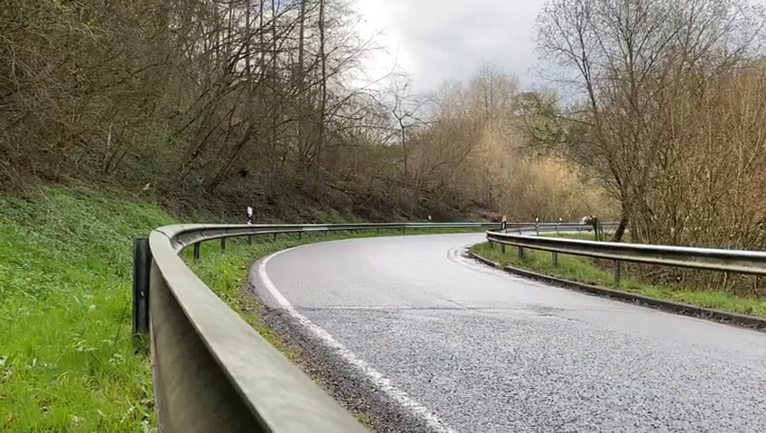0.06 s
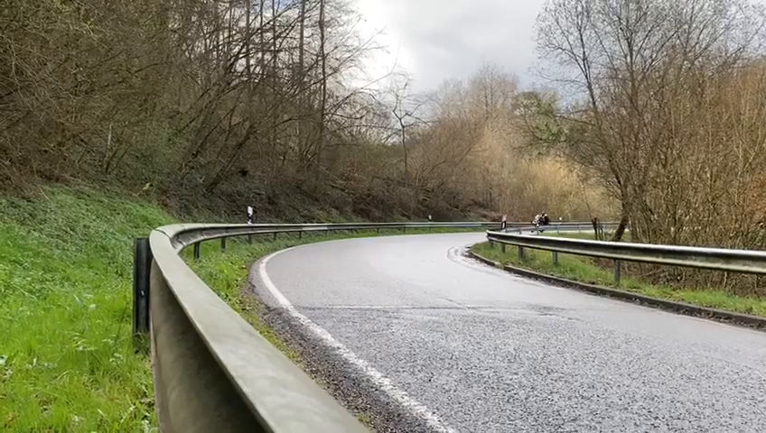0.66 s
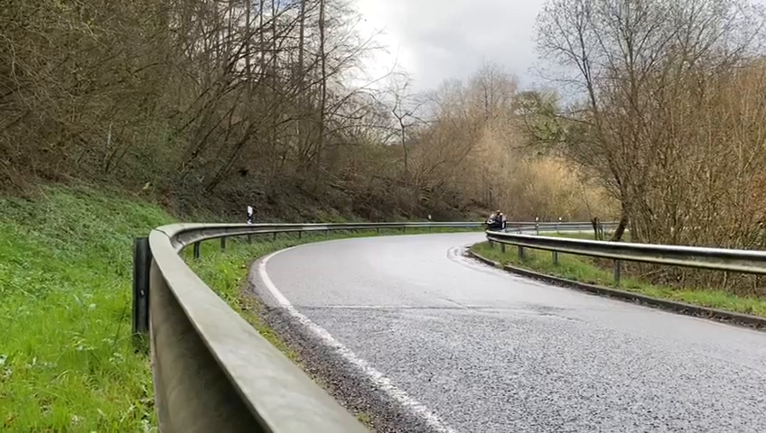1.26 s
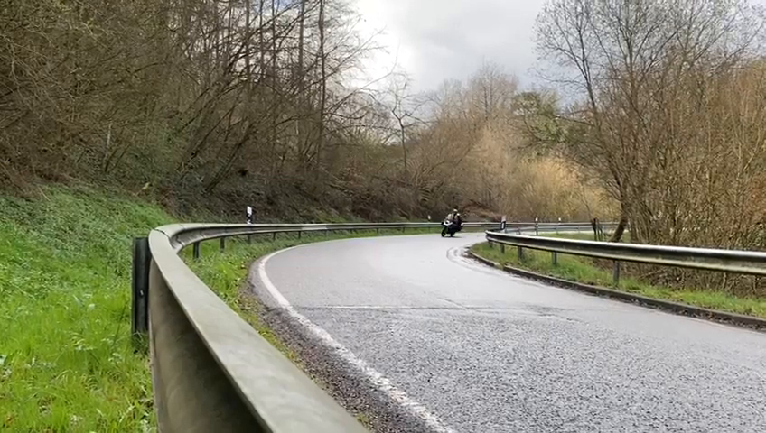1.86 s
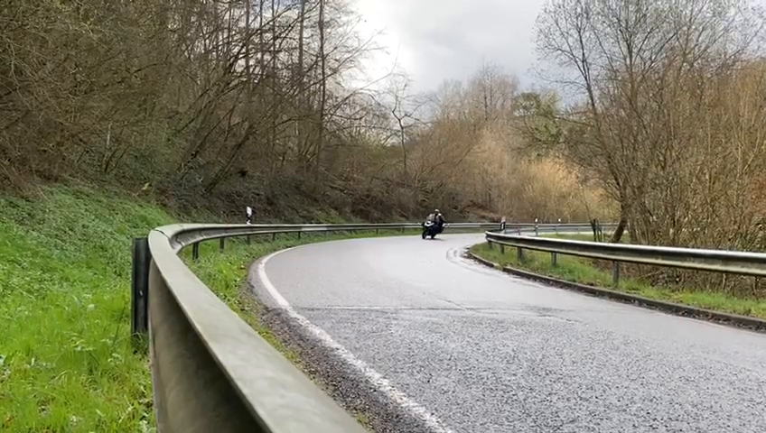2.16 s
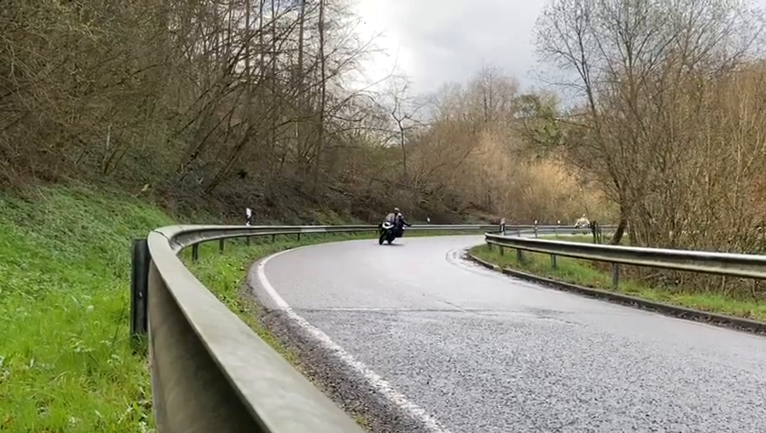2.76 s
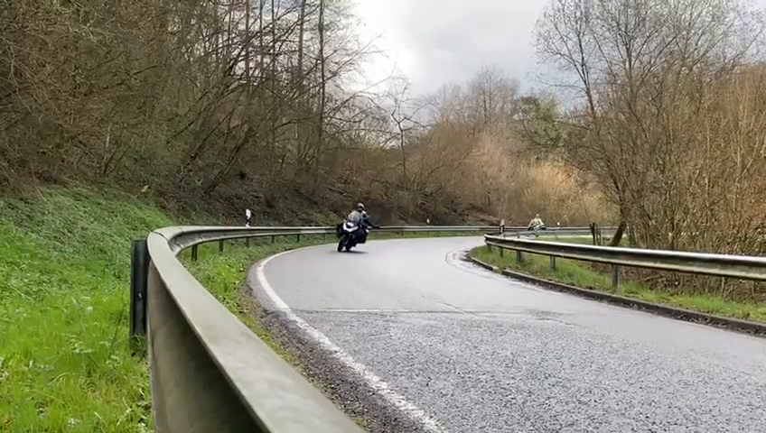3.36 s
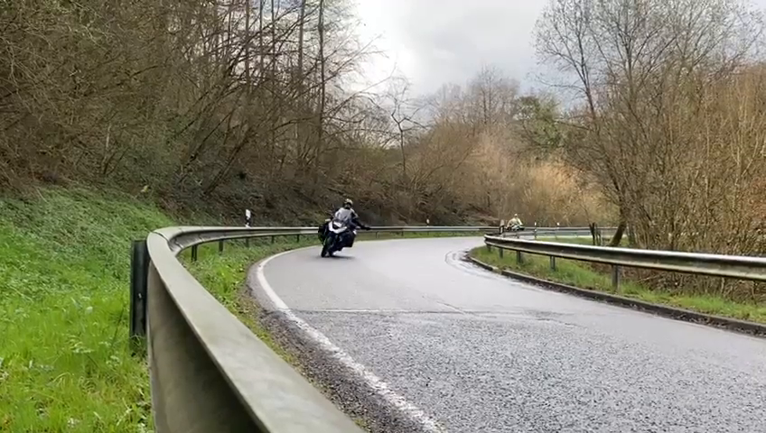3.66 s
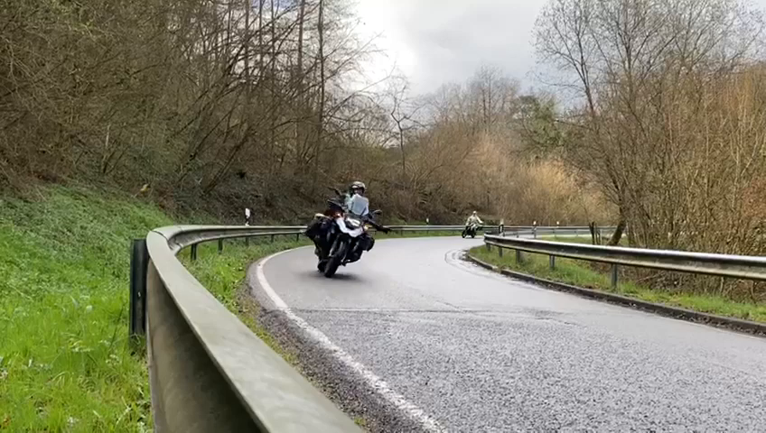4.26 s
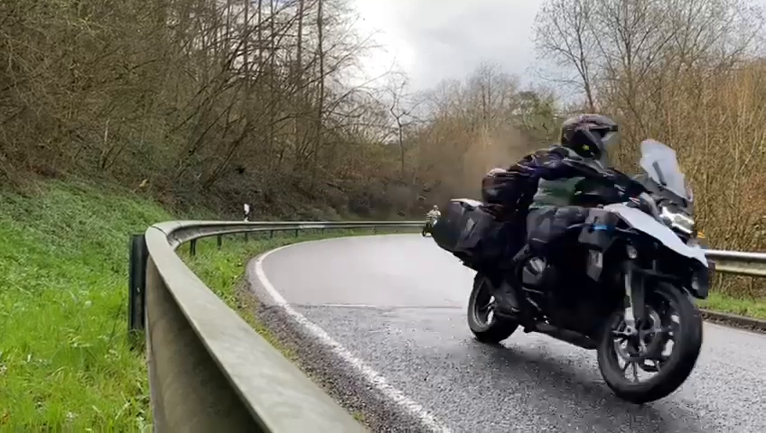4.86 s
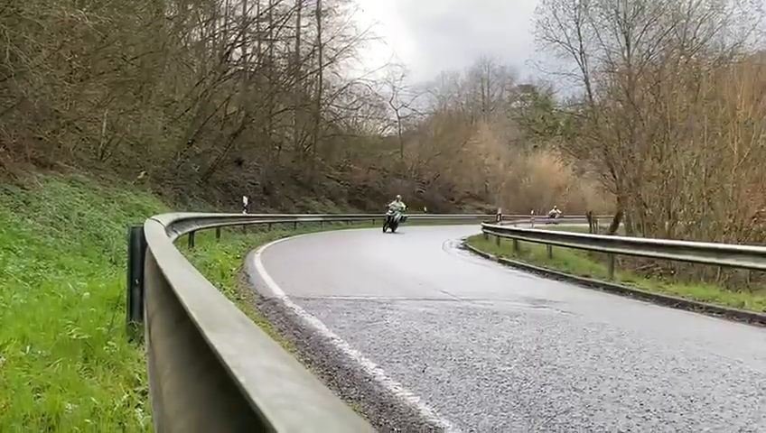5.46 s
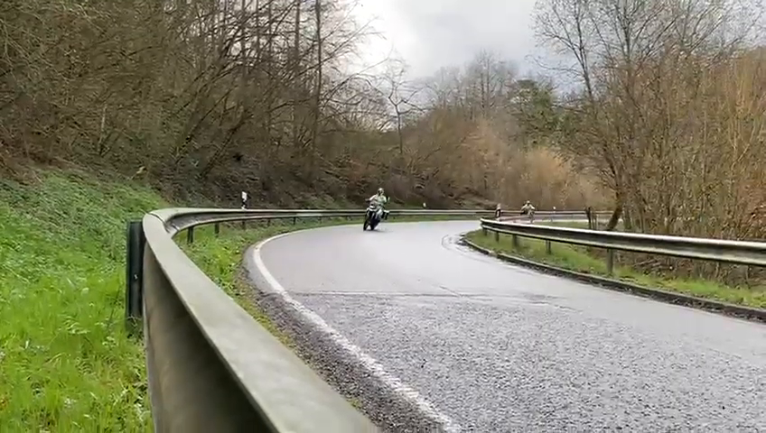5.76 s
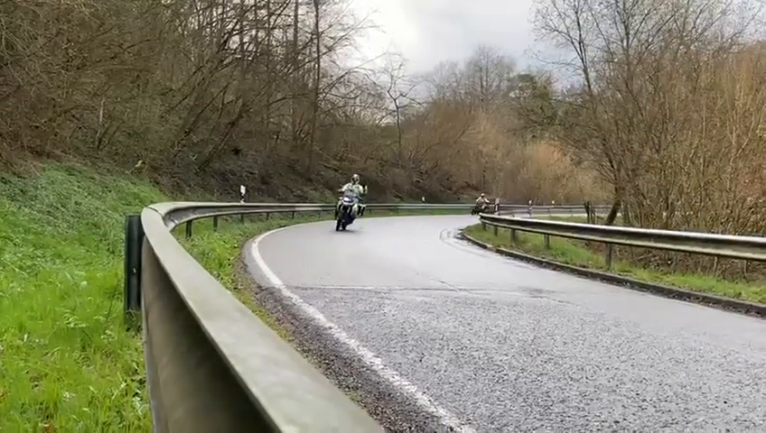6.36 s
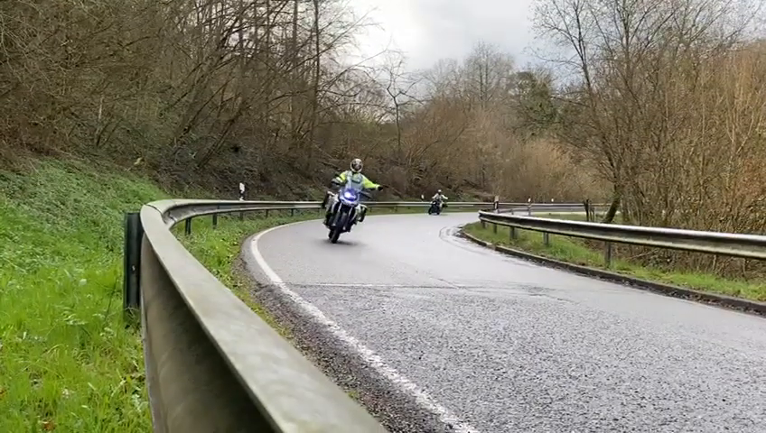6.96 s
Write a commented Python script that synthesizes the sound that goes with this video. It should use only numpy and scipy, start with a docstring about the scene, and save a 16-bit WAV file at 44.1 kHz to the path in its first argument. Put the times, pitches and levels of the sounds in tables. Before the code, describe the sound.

Heard from the edge of a wooded country road, several motorcycles hum in the distance under a few thin bird chirps. One approaches at low revs, its throbbing engine and hissing tyres building to a close pass from left to right. Its note drops slightly as it leaves. A soft knock and a tick follow as the engines behind it grow louder.

```python
"""First you hear motorcycles droning far off in a damp country bend, soon joined by faint birds.
The lead bike, a twin-cylinder at low revs, comes into the open and passes close by, left to right,
while two more follow at a distance. Each firing of its engine pushes out a puff of gas; the puffs
blend into a drone over a pulsing rasp. Tyre roar and spray swell as it goes by, bounce off the road
and make the steel guard rail ring faintly. A dull knock and a tick come near the end."""
import sys
import numpy as np
from scipy import signal
from scipy.fft import rfft, irfft, next_fast_len
from scipy.io import wavfile
from scipy.ndimage import uniform_filter1d, minimum_filter1d

SR = 44100
rng = np.random.default_rng(int(sys.argv[2]) if len(sys.argv) > 2 else 0)


def transcribe(u):
    """Save the signal u as a 16-bit wav file named by the first command-line argument.

    u: samples, shape (n,) or (channels, n), limited to [-1, 1]; the rate is SR.
    q: integer samples, one column per channel.
    """
    v = np.clip(np.atleast_2d(u).T, -1, 1)
    q = np.round(v * 32767).astype(np.int16)
    wavfile.write(sys.argv[1], SR, q)


N = 313110
TIME = np.arange(N) / SR


def from_db(db):
    """Turn decibels into a number to multiply by."""
    return 10 ** (np.asarray(db) / 20)


def rms_one(x):
    """Scale a signal so that its average power is 1."""
    return x / np.sqrt(np.mean(x ** 2) + 1e-20)


def in_time(rows, t=TIME):
    """Read a table's columns at times t, gliding between rows."""
    times, *columns = np.transpose(rows)
    return [np.interp(t, times, c) for c in columns]


def at_hz(rows, hz):
    """Read a table's columns at frequencies hz, gliding between rows."""
    freqs, *columns = np.transpose(rows)
    return np.array([np.interp(np.log(hz + 1), np.log(freqs), c) for c in columns])


def drift(rate_hz):
    """A smooth random wander, typically about 1 away from zero."""
    pole = np.exp(-200 * np.pi * rate_hz / SR)
    steps = rng.standard_normal(N // 100 + 1002)   # one for every 100 samples
    slow = signal.lfilter([1], [1, -2 * pole, pole * pole], steps)[1000:]
    return np.interp(np.arange(N) / 100, np.arange(len(slow)), rms_one(slow))


def blend(shapes, points, x):
    """Fade from shape to shape along x; each is heard alone at its own point."""
    weights = [np.interp(x, points, row) for row in np.eye(len(points))]
    return sum(shape.reshape(len(shape), -1) * weight for shape, weight in zip(shapes, weights))


def bump(x, centre, half_width):
    """A bell curve of height 1."""
    return np.exp(-((x - centre) / half_width) ** 2)


def until(time_s, takes_s):
    """Fall smoothly from 1 to 0 around time_s."""
    return (1 - np.tanh((TIME - time_s) / takes_s)) / 2


def die_away(n):
    """Fade by 60 dB over n samples."""
    return np.exp(-np.log(1000) * np.arange(n) / n)


# bird calls: (time [s], length [s], start pitch [Hz], end pitch [Hz], relative level [dB])
CHIRPS = [(1.519, .07, 5680, 5400, -60.5), (1.66, 0.025, 5600, 5250, -61.5), (1.705, .06, 4350, 4350, -63),
          (2.198, .055, 4300, 4420, -54), (2.676, .025, 5680, 5290, -57), (2.712, 0.075, 4420, 4370, -53.5),
          (3.181, .025, 5540, 5155, -56.5), (3.226, 0.08, 4370, 4400, -54)]


def birds(level_db, waver):
    """Small birds whistle short, gliding notes with a wavering pitch."""
    out, wobble = np.zeros(N), 1 + waver * drift(60)
    for time_s, length_s, start_hz, end_hz, db in CHIRPS:
        n, at = int(length_s * SR), int(time_s * SR)
        hz = np.linspace(start_hz, end_hz, n) * wobble[at:at + n]
        whistle = np.sin(2 * np.pi * np.cumsum(hz) / SR)
        out[at:at + n] += from_db(db + level_db) * np.sqrt(2 * np.hanning(n)) * whistle
    return out


def tree_echo(x, ring_s, level_db):
    """The trees add a soft tail of echoes, a different one for each ear."""
    n = int(ring_s * SR)
    tail = rms_one(rng.standard_normal((2, n)) * die_away(n)) / np.sqrt(n)
    return x + from_db(level_db) * signal.fftconvolve(x[None], tail, axes=1)[:, :N]


# a dull knock and a tick: (time [s], centre [Hz], length [s], level [dB], left over right [dB])
KNOCKS = [(6.046, 580, .045, -26, -5), (6.701, 5000, .025, -39, 0)]


def knocks():
    """Short bursts of noise, an octave wide, that die quickly."""
    out = np.zeros((2, N))
    for time_s, hz, length_s, db, pan_db in KNOCKS:
        n, at = int(length_s * SR), int(time_s * SR)
        band = signal.butter(2, [hz / np.sqrt(2), hz * np.sqrt(2)], "band", fs=SR, output="sos")
        burst = rms_one(signal.sosfilt(band, rng.standard_normal(n))) * die_away(n)
        out[:, at:at + n] += from_db([[db + pan_db / 2], [db - pan_db / 2]]) * burst
    return out


def firing_phase(firing_hz, wobble):
    """An angle that goes round once per firing of a slightly uneven engine."""
    return 2 * np.pi * np.cumsum(firing_hz * (1 + wobble * drift(16))) / SR


def drone(phase, tones, flutter_db):
    """Tones at multiples of the firing rate, each fluttering as echoes from the roadside bank shift."""
    out = 0
    for multiple, db in tones:
        gain = from_db(db + flutter_db * drift(4.7))
        out += gain * np.cos(multiple * phase + rng.uniform(0, 2 * np.pi))
    return np.sqrt(2) * out


def distant_bike(ride, tones, dulling, spread):
    """Only the drone carries this far, duller when it is fainter; the trees scatter some of it."""
    firing_hz, level_db = in_time(ride)
    phase = firing_phase(firing_hz, wobble=0.01287)
    dull_db = dulling * (level_db - level_db.max())
    heard = [(multiple, db + level_db + multiple * dull_db) for multiple, db in tones]
    direct = drone(phase, heard, flutter_db=2.6)
    scattered = drone(phase, heard, flutter_db=7)
    return direct + spread * scattered * [[1], [-1]]


# how each following bike runs: (time [s], firing rate [Hz], level [dB])
SECOND_RIDE = [(0, 44.33, -44), (.8, 44.9, -43), (1.3, 47.52, -39.5), (3, 44.15, -43.5), (5, 44.1, -58),
               (6.1, 44.2, -39), (6.7, 44.48, -33), (7.1, 44.8, -31)]
THIRD_RIDE = [(0, 77.44, -30.5), (1.2, 76.94, -34.5), (2.5, 74.68, -40), (4, 81, -42), (6, 76.8, -45.5),
              (7.1, 79.5, -41)]
# the tones of their drones: (pitch [times the firing rate], relative level [dB])
SECOND_TONES = [(1, -5.5), (2, 1), (3, -1.5), (3.5, -12.5), (10, -10.5), (11.5, -14)]
THIRD_TONES = [(1, -4.5), (2, -22.5), (3, -19)]


def following_bikes():
    """Two more engines drone in the distance, one low and one higher."""
    second = distant_bike(SECOND_RIDE, SECOND_TONES, dulling=0.11, spread=0.28)
    return second + distant_bike(THIRD_RIDE, THIRD_TONES, dulling=0.08, spread=0.13)


# the notes of the guard rail: (pitch [Hz], level against the noise that shakes it [dB])
RAIL_NOTES = [(1088, -13.5), (1179, -5), (1527, -4.5), (1687, -1), (2194, -3.5), (2463, -4.5), (2678, -8.5),
              (3112, -10.5)]


def guard_rail(noise, width_hz):
    """The steel rail beside the microphone rings along with the noise of the ride."""
    return noise + sum(from_db(db) * signal.lfilter(*signal.iirpeak(hz, hz / width_hz, fs=SR), noise)
                       for hz, db in RAIL_NOTES)


PASS_S, SPEED_M_PER_S = 4.991, 12.3   # when and how fast the lead bike's front wheel goes by


def pass_by(closest_m, behind_m):
    """For a spot behind the front wheel: dB lost to distance, and how much we hear its rear (0-1)."""
    along_m = SPEED_M_PER_S * (TIME - PASS_S) - behind_m
    distance_m = np.hypot(along_m, closest_m)
    return 20 * np.log10(closest_m / distance_m), np.maximum(along_m / distance_m, 0) ** 2


def hidden():
    """The inside of the bend hides the lead bike (1) until it comes into the open (0)."""
    return until(1.86, takes_s=0.23)


# noise from the bikes still in the bend: (time [s], relative level [dB])
BEND_NOISE = [(0, -8.7), (.7, -8.5), (1.2, -5), (1.6, -2.5), (2, -2), (2.6, -0.1), (3.5, 0.7), (4.3, 0),
              (5.8, 0.5), (6.2, 0.9), (6.55, 2.5), (7.1, 5)]
# rumble, rasp, tyre roar and spray, a row each: (behind the front wheel [m], level alongside [dB],
# distance effect [factor], change from behind [dB], change while hidden [dB], level from the bend [dB],
# effect of BEND_NOISE [factor])
RIDE_NOISES = [(2.4, -21.5, 0.94, -9.5, -8.5, -39.5, 0.99), (0, -24, 1.08, 3.5, -1.5, -39.5, 1.34),
               (1.45, -22.5, 1.225, -9, -2.5, -40.5, 0.8), (1.445, -28, 1.063, -12, -5, -55, 1.47)]


def noise_levels():
    """Relative dB of the four noises: the lead bike's swell on top of the noise from the bend."""
    levels, bend_db = [], in_time(BEND_NOISE)[0]
    for behind_m, db, falloff, rear_db, hidden_db, far_db, swing in RIDE_NOISES:
        distance_db, rear = pass_by(closest_m=2.34, behind_m=behind_m)
        close = from_db(db + falloff * distance_db + rear_db * rear)
        far = from_db(far_db + swing * bend_db)
        levels.append(20 * np.log10(np.hypot(close, far)) + hidden_db * hidden())
    return levels


# the deep tone of the exhaust gas: (frequency [Hz], relative level [dB])
RUMBLE_TONE = [(18, -3), (30, -2.5), (45, 3.5), (80, 7.5), (140, 7), (200, 2.5), (280, -20), (420, -38)]


def gas_rumble(level_db, boost_db, width):
    """Swirling exhaust gas rumbles, and its echo from the wooded bank widens the sound."""
    size = next_fast_len(N)
    tone = from_db(at_hz(RUMBLE_TONE, np.fft.rfftfreq(size, 1 / SR)))
    noise = rng.standard_normal((2, size))
    direct, echo = rms_one(irfft(tone * rfft(noise))[:, :N])
    return from_db(level_db + boost_db) * (direct + width * echo * [[1], [-1]])


def road_echo(hz, t, lowest_dip_hz, strength, scatter_hz):
    """The bounce off the road cancels a band, lowest and deepest when the bike is close."""
    distance_db, _ = pass_by(closest_m=3.6, behind_m=2.94)
    nearness = from_db(np.interp(t, TIME, distance_db))
    dip_hz = lowest_dip_hz / nearness
    bounce = strength * nearness * bump(hz[:, None], 0, scatter_hz)   # rough asphalt scatters the treble
    return abs(1 + bounce * np.exp(1j * np.pi * hz[:, None] / dip_hz))


def echo_ripple(hz, t, depth_db, frames=18):
    """Weak echoes from trunks and rail shift, so narrow peaks and dips come and go in the noise."""
    chance = rng.standard_normal((len(hz), len(t)))
    smooth = uniform_filter1d(uniform_filter1d(chance, frames), frames)
    return from_db(depth_db * rms_one(smooth))


# brief changes in the roar: (time [s], half length [s], centre [Hz], half width [octaves], change [dB])
ROAR_SWELLS = [(1.58, 0.098, 1190, 0.5, 4.5), (3.4, 0.34, 2481, 0.13, 2.5), (4.803, 0.17, 3201, 0.36, 5.2),
               (4.985, 0.051, 1400, 0.4, 2.5), (5.095, 0.051, 2600, .25, 5), (5.235, .06, 1210, .4, 2.5),
               (5.34, 0.066, 2400, .4, 4.5), (5.48, .12, 2227, 0.24, 6), (5.72, .13, 6500, 0.17, 3.5),
               (5.98, 0.27, 2200, 1, -0.5), (6.55, .2, 1191, .5, 3), (6.902, .35, 2300, 0.34, 2)]


def roar_swells(hz, t):
    """The road roar swells or eases briefly in single bands as the bikes move."""
    change_db = 0
    for time_s, half_s, centre_hz, octaves, db in ROAR_SWELLS:
        band = bump(np.log2((hz + 1) / centre_hz), 0, octaves)
        change_db += db * np.outer(band, bump(t, time_s, half_s))
    return from_db(change_db)


# a narrow gap in the roar: (time [s], height above its lowest point [Hz], depth [dB])
HOLLOW = [(5.14, 700, 0), (5.2, 420, -5), (5.27, 30, -10), (5.38, 0, -13), (5.5, 200, -12), (5.62, 290, 0)]


def hollow(hz, t, lowest_hz, half_width_hz):
    """Once the bike is past, the two ears cancel in a narrow band that swoops down and climbs again."""
    above_hz, depth_db = in_time(HOLLOW, t)
    return from_db(depth_db * bump(hz[:, None], lowest_hz + above_hz, half_width_hz))


# how noise from each direction reaches the two ears:
# (frequency [Hz], likeness [0-1], left over right [dB], left lag [radians])
FROM_FAR = [(255, 1, -1.5, 1.5), (600, 0.4, -5, 0), (1400, 0.6, 0, 2), (2230, 0.06, 1.5, 1.5),
            (4230, 0.1, 3, -8.5), (5770, 0.95, 2.5, 25), (6540, 1, 0, -12.5)]
FROM_AHEAD = [(250, 0.97, -2.5, 0), (880, 1, -1, 0), (1360, 0.75, 0, -0.2), (2620, .8, 0, -0.2),
              (3950, 1, -1, -2.5), (4456, 0.33, 7, -2.7), (5200, 0.44, -1, 0.5), (6600, .99, 0.5, 0)]
FROM_BESIDE = [(250, 1, -1.5, .1), (900, 0.92, -5, -0.096), (1600, 0.99, -1.5, 0.84), (2503, .5, 4, -0.64),
               (4200, 0.92, 0, -0.25), (5530, 0.45, 2, 1.4), (7050, 1, -0.5, -0.28)]
FROM_BEHIND = [(250, 0.9, -2.5, 0.8), (600, 0.7, -3, 2.3), (1100, 0.76, -5, 2.35), (1480, 0.99, -0.8, 2.9),
               (1660, 0.99, -0.8, 3.35), (1880, 0.85, -2, 4.2), (2200, 0.8, -2.5, 4.9),
               (3000, 0.55, 1.2, 5.8), (4300, 0.43, -0.7, 5.7), (5500, 0.37, 0.5, 6.5),
               (7000, .97, 0, 6.28)]
FROM_LEAVING = [(260, 0.89, -10, 0.75), (600, 0.84, -14.5, 2.11), (1100, 0.45, -8.5, 2.4),
                (1800, 0.83, -6.5, 2.3), (2400, 0.56, -2, 4.9), (3300, 0.24, -0.5, 4.3),
                (4500, 0.09, 1, 5.3), (5800, 0.1, 3.5, 5.3), (7000, 1, 1.5, 7), (8300, 1, -1.5, 5.6)]
FROM_BOTH_WAYS = [(250, 0.49, -11, 2.2), (603.5, 0.26, -10.5, 1.2), (1300, 0.24, -4, 2.5),
                  (2210, 0.18, -0.5, 0.6), (3180, 0.61, 0, -1.5), (5670, 0.15, 1.5, 1.5), (7050, 1, 1, 0.5),
                  (8300, 1, -3, -1)]
# when each step of the route below is reached: (time [s])
DIRECTION_TIMES = [.8, 2.2, 4.55, 4.85, 5.02, 5.19, 5.48, 5.62, 5.78, 6.099]


def stereo_image(hz, t):
    """As the bike's direction turns: how alike the ears are (with their lag), and the lean to the left."""
    far, ahead, beside = (at_hz(rows, hz) for rows in (FROM_FAR, FROM_AHEAD, FROM_BESIDE))
    leaving, both = at_hz(FROM_LEAVING, hz), at_hz(FROM_BOTH_WAYS, hz)
    swoop_hz = np.outer(np.interp(hz, [0, 2000, 5000], [0, 1, 0]), in_time(HOLLOW, t)[0])
    behind = at_hz(FROM_BEHIND, hz[:, None] - swoop_hz)   # slides along with the hollow
    route = [far, ahead, ahead, beside, beside, behind, behind, leaving, leaving, both]
    likenesses, pan_dbs, lags = zip(*route)
    turn = np.angle(blend([np.exp(-1j * lag) for lag in lags], DIRECTION_TIMES, t))
    alike = np.clip(blend(likenesses, DIRECTION_TIMES, t), 0, 0.995) * np.exp(1j * turn)
    return alike, from_db(blend(pan_dbs, DIRECTION_TIMES, t) / 2)


# tone of rasp, tyres and spray for each view of the bike: (frequency [Hz], relative level [dB])
TONE_FAR = [(250, 1), (330, -9.5), (520, -11), (800, -14), (1050, -13.5), (1300, -11.5), (1700, -13.5),
            (2100, -16), (3100, -18), (4000, -25), (5500, -30), (7500, -34), (9000, -43), (11500, -61)]
TONE_LEANING = [(250, -12), (340, -9), (550, -8.5), (740, -14), (950, -10.5), (1420, -14.5), (1660, -10),
                (1850, -13.5), (2200, -13), (2900, -11.5), (4200, -12.5), (5500, -18), (7800, -18.5),
                (11500, -40.5)]
TONE_AHEAD = [(250, 2), (340, -2.5), (450, -5), (590, 0), (770, -5), (1230, -5), (1700, -9.5), (2150, -14),
              (3000, -10.5), (4100, -16.5), (5500, -29.5), (7500, -27.5), (9000, -35.5), (11500, -45.5)]
TONE_BESIDE = [(250, -5), (400, -4), (600, 1), (800, -4.5), (1000, -4.5), (1250, -0.5), (1550, 0.5),
               (1900, 2), (2550, -4), (3300, -6.5), (4200, -11), (5400, -18.5), (7200, -13.5),
               (11500, -27.5)]
TONE_BEHIND = [(250, 3.5), (400, 0), (680, 2), (950, -4.5), (1350, -7.5), (1850, -15), (2350, -15),
               (3300, -19), (4500, -23.5), (6000, -24.5), (8000, -31), (11500, -59)]
# when each of the views below is reached: (time [s])
VIEW_TIMES = [1.5, 1.999, 2.6, 3.4, 4.45, 4.95, 5.15, 5.5]
# how much treble comes through the air: (time [s], relative level at 10 kHz [dB])
AIR_TREBLE = [(0, -7), (1.2, 16), (2.2, 9), (3.2, 1.5), (4, 8), (4.8, 7), (5.4, -2), (6.2, -6.5), (7.1, 2)]


def noise_tone(hz, t):
    """The tone of the noise depends on the side the bike shows, on the air and on echoes."""
    tables = (TONE_FAR, TONE_LEANING, TONE_AHEAD, TONE_BESIDE, TONE_BEHIND)
    far, leaning, ahead, beside, behind = (at_hz(rows, hz)[0] for rows in tables)
    views = [far, leaning, leaning, ahead, ahead, beside, beside, behind]
    air_db = np.outer((hz / 10000) ** 2, in_time(AIR_TREBLE, t)[0])
    tone = from_db(blend(views, VIEW_TIMES, t) + air_db)
    bounce = road_echo(hz, t, lowest_dip_hz=590, strength=0.73, scatter_hz=1910)
    return tone * bounce * echo_ripple(hz, t, depth_db=2.3)


def ride_noise(level_dbs):
    """Exhaust rasp, tyre roar and spray are the low, middle and high parts of one rushing noise."""
    hz, t, (shared, separate) = signal.stft(rng.standard_normal((2, N)), SR, nperseg=1024)
    tone = noise_tone(hz, t)
    alike, lean = stereo_image(hz, t)
    left = alike * shared + np.sqrt(1 - abs(alike) ** 2) * separate
    ears = np.array([left * lean, shared / lean])
    # each part sets the level of its own range, as heard midway between the ears
    power = tone ** 2 * (lean ** 2 + lean ** -2 + 2 * alike.real) / 4
    gain_dbs = []
    for db, (low_hz, high_hz) in zip(level_dbs, [(320, 1000), (1000, 4000), (4000, 8000)]):
        band_power = power[(hz > low_hz) & (hz < high_hz)].sum(0) / len(hz)
        gain_dbs.append(np.interp(t, TIME, db) - 10 * np.log10(band_power))
    rasp_db, tyre_db, spray_db = gain_dbs
    gain = from_db(blend([rasp_db, tyre_db, tyre_db, spray_db], [650, 1300, 2800, 6000], hz).T)
    spectrum = ears * tone * gain * roar_swells(hz, t) * hollow(hz, t, lowest_hz=1580, half_width_hz=95)
    noise = signal.istft(spectrum, SR, nperseg=1024)[1][:, :N]
    return signal.sosfilt(signal.butter(3, 240, "high", fs=SR, output="sos"), noise)


def chuff(phase, depth, clatter):
    """Gas leaves in a burst at every firing; the valves add a flutter once every two firings."""
    valves = np.cos(phase / 2) + np.cos(1.5 * phase)
    return rms_one(1 + depth * np.cos(phase) + clatter * valves)


# the lead bike's tones at 1 to 4 times its firing rate, a row each:
# (level alongside [dB], distance effect [factor], change from behind [dB], change while side-on [dB])
LEAD_TONES = [(-15, 0.59, -2.9, -2), (-8.5, 0.92, 0.1, 1.5), (-30.5, 0.76, 5, 1), (-26, 0.75, -0.5, -10.5)]


def exhaust_levels():
    """Levels in dB of the four low tones and the buzz, as the tailpipe nears, turns and moves away."""
    # the drone fills the space between bank and rail, so it swells broadly, as if from farther off
    distance_db, rear = pass_by(closest_m=3.76, behind_m=2.24)
    side_on = until(2.78, takes_s=0.12)   # then the bike straightens up and faces the microphone
    tone_dbs = [db + falloff * distance_db + rear_db * rear + side_db * side_on
                for db, falloff, rear_db, side_db in LEAD_TONES]
    buzz_db = -41.5 + 0.48 * distance_db + 5 * side_on - 15 * hidden()
    return tone_dbs, buzz_db


# brief dips and swells of the low tones: (time [s], half length [s], tone [1-4], change [dB])
SWAYS = [(.22, .1, 1, 3), (.53, .04, 1, -9), (.8, .035, 1, -8), (.95, .2, 4, 6), (1.18, .045, 1, -9),
         (1.47, .07, 1, 4), (1.54, .035, 2, -11), (1.72, .04, 1, -10), (1.87, .06, 1, -6),
         (2.47, .03, 2, -5), (2.95, .3, 1, -2.5), (3.62, .14, 2, 2.5), (3.72, .03, 2, -10),
         (6.14, .06, 2, -3), (6.36, .12, 2, 2), (6.68, .06, 2, -6)]
# the tones of the buzz: (pitch [times the firing rate], relative level [dB])
BUZZ_TONES = [(1.5, 2), (2.5, -12), (3.5, -8), (5, -10), (6, -3.5), (7, -7), (8, -2.5), (9, -1), (10, -8)]


def lead_exhaust(phase, uneven_db, flutter_db):
    """Four low tones add up to one puff per firing, each puff a little different, under a faint buzz."""
    tone_dbs, buzz_db = exhaust_levels()
    throb_dbs = (1.25, 0.5, 1.2, 1)
    puffs = 0
    for tone, (db, throb_db) in enumerate(zip(tone_dbs, throb_dbs), 1):
        stirred = np.clip(-db / 30, 0, 2)   # echoes from the bank stir faint tones most
        shift = np.pi / 2 * (tone > 1) + stirred * flutter_db * drift(18) * np.log(10) / 20
        waver_db = stirred * (flutter_db * drift(13.3) + throb_db * drift(5))
        sway_db = sum(change_db * bump(TIME, time_s, half_s)
                      for time_s, half_s, which, change_db in SWAYS if which == tone)
        puffs += from_db(db + waver_db + sway_db) * np.cos(tone * phase + shift)
    buzz = from_db(buzz_db) * drone(phase, BUZZ_TONES, flutter_db=1)
    return buzz - np.sqrt(2) * puffs * from_db(-uneven_db * drift(25))


# how fast the lead engine fires, sagging as it passes: (time [s], firing rate [Hz])
LEAD_FIRING = [(0, 60.3), (.28, 61.6), (.75, 60.44), (.98, 61), (1.08, 58.85), (1.5, 59.9), (2.1, 61.2),
               (2.9, 63.1), (3.22, 61.1), (3.32, 62.5), (3.55, 60.7), (4.05, 59), (4.58, 58.4),
               (4.88, 60.43), (4.98, 56.6), (5.15, 59), (5.28, 56.8), (5.55, 55.9), (6, 56.1), (6.1, 57.8),
               (6.25, 56.15), (6.65, 58.27), (7.1, 59.7)]
# where its drone comes from: (time [s], left over right [dB], left lag [ms])
DRONE_PAN = [(0, -.3, 0), (4.8, 0, .02), (5.2, -1.3, .3), (5.7, -2.9, .55), (6.3, -2.3, .4),
             (7.1, -1.7, .15)]


def lead_bike():
    """The drone and its firing phase; once past, the drone reaches the left ear later and weaker."""
    phase = firing_phase(in_time(LEAD_FIRING)[0], wobble=0.002)
    exhaust = lead_exhaust(phase, uneven_db=0.1, flutter_db=1.56)
    pan_db, lag_ms = in_time(DRONE_PAN)
    left = np.interp(TIME - lag_ms / 1000, TIME, exhaust)
    return np.array([left, exhaust]) * from_db(pan_db * [[0.5], [-0.5]]), phase


def scene():
    """Add up the roadside, the two followers, the noise of the ride and the lead bike."""
    exhaust, phase = lead_bike()
    rumble_db, *ride_dbs = noise_levels()
    rumble = gas_rumble(rumble_db, boost_db=3, width=0.03)
    followers = following_bikes()
    rush = ride_noise(ride_dbs) * chuff(phase, depth=0.065, clatter=0.075)
    road = guard_rail(rush, width_hz=15.4)
    birdsong = tree_echo(birds(level_db=4, waver=0.0051), ring_s=0.7, level_db=-12)
    return birdsong + knocks() + followers + road + rumble + exhaust


def limit(x, ceiling, samples=120):
    """Turn the sound down briefly, just ahead of any peak above the ceiling."""
    gain = ceiling / np.maximum(abs(x).max(0), ceiling)
    return x * uniform_filter1d(minimum_filter1d(gain, samples), samples)


def record(dry):
    """Flip the left channel's wave around 9 kHz, hold down the peaks and cut the highest treble."""
    size = next_fast_len(N + 2048)
    hz = np.fft.rfftfreq(size, 1 / SR)
    turn = np.interp(hz, [7450, 8450, 9550, 10450], [0, np.pi, np.pi, 2 * np.pi])
    left = irfft(rfft(dry[0], size) * np.exp(-1j * turn), size)[:N]
    treble_cut = signal.ellip(12, 0.01, 90, 11650, fs=SR, output="sos")
    return signal.sosfilt(treble_cut, limit(np.array([left, dry[1]]), ceiling=0.93))


dry = scene()
out = record(dry)
transcribe(out)
```